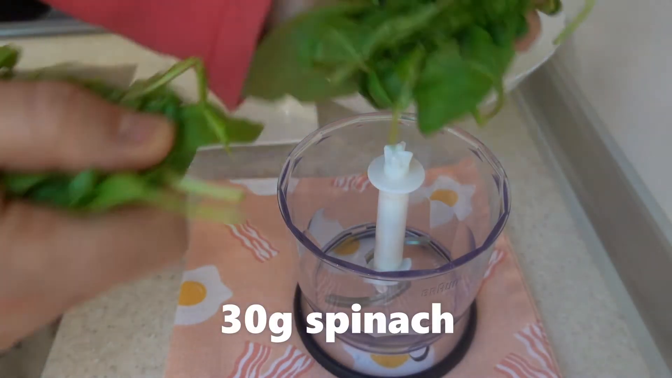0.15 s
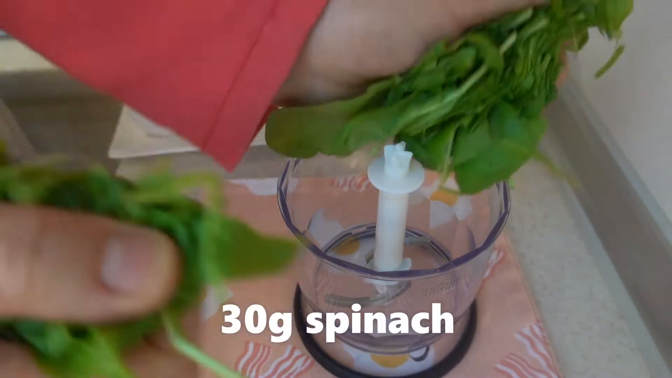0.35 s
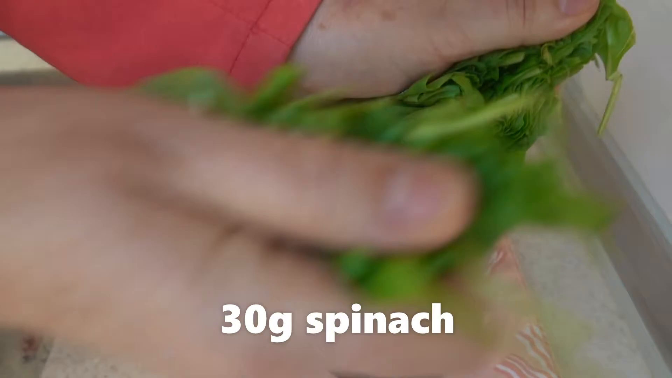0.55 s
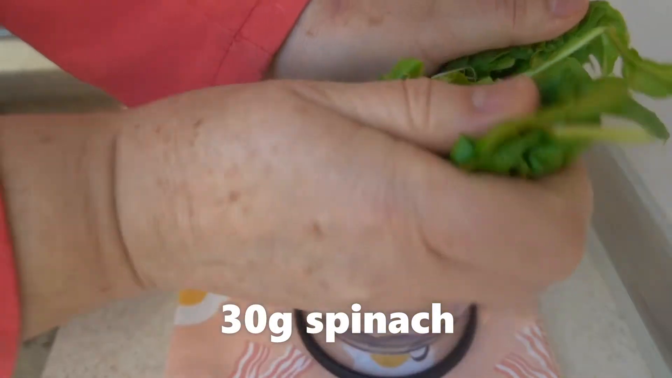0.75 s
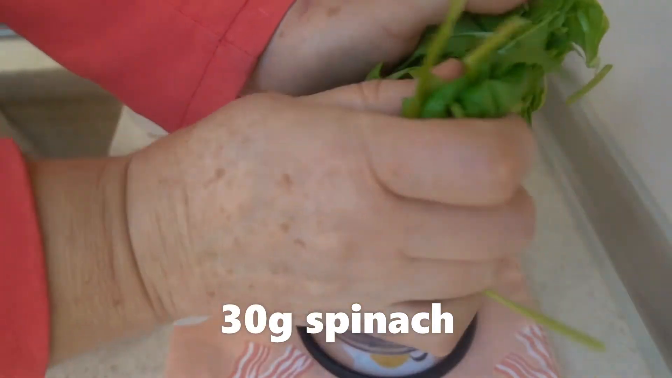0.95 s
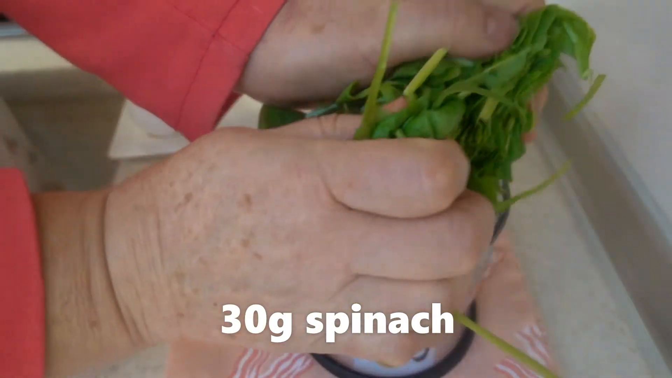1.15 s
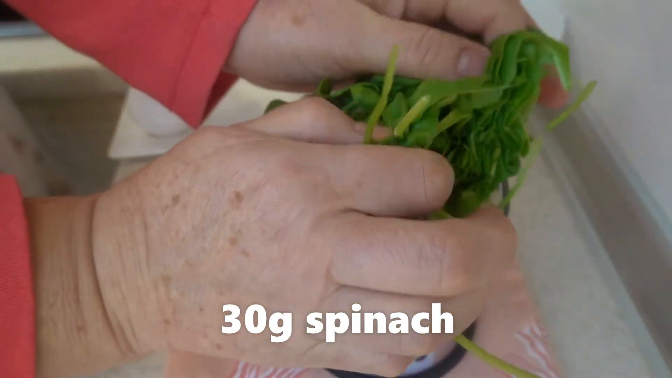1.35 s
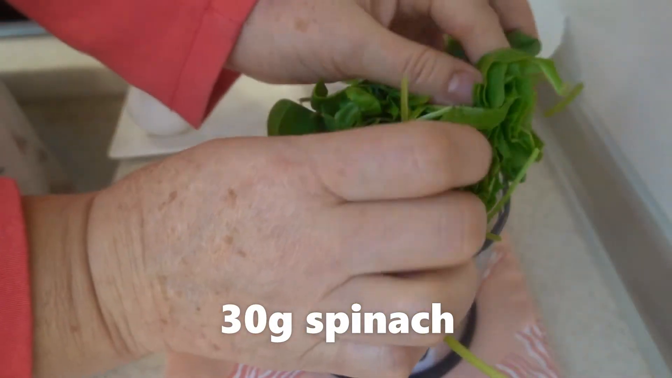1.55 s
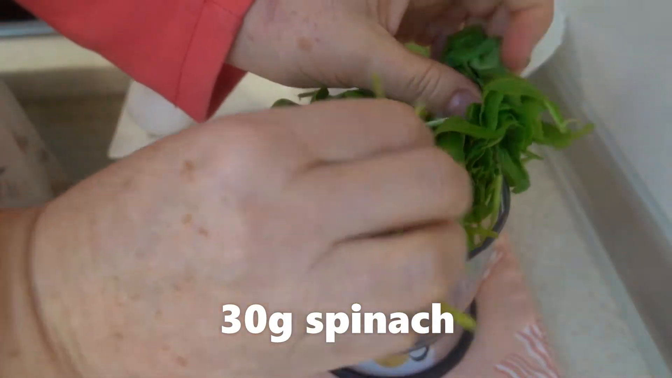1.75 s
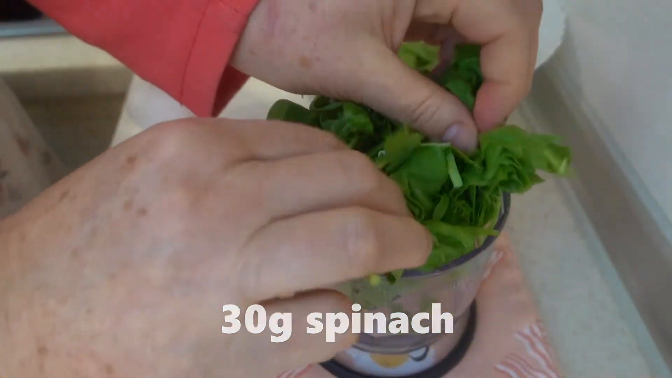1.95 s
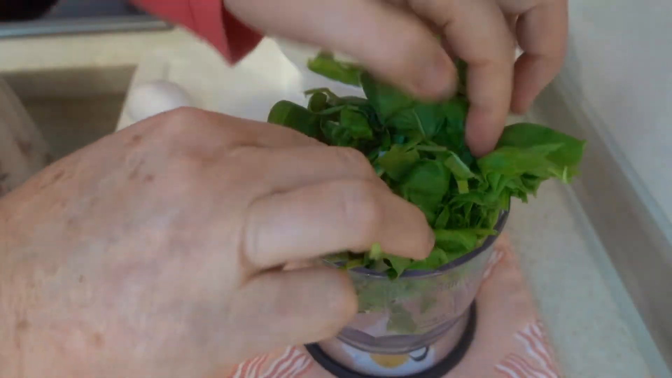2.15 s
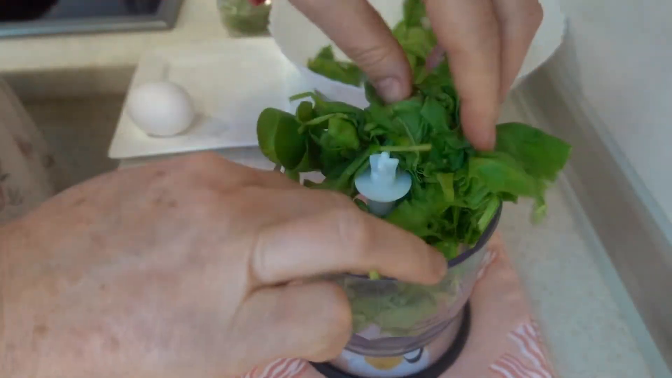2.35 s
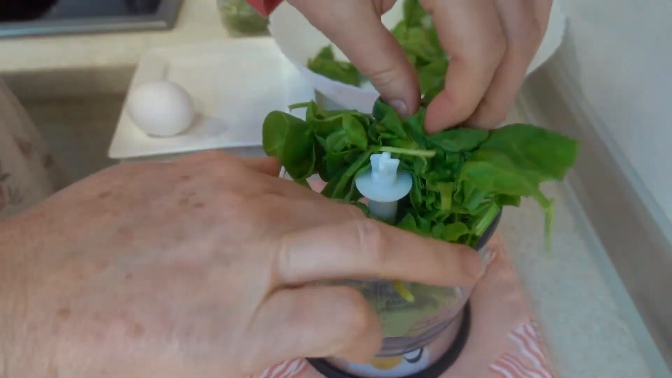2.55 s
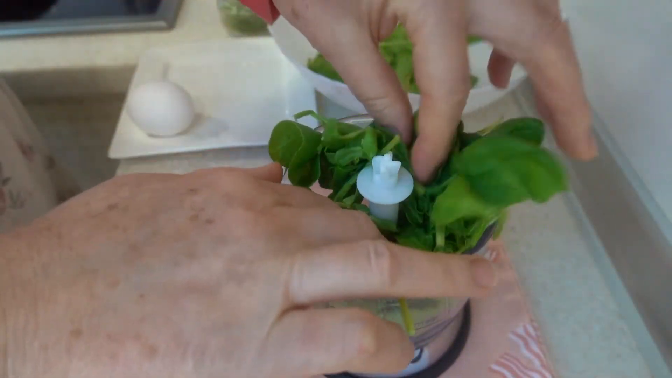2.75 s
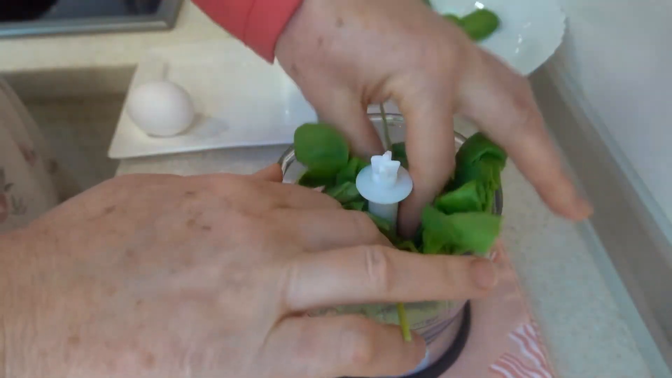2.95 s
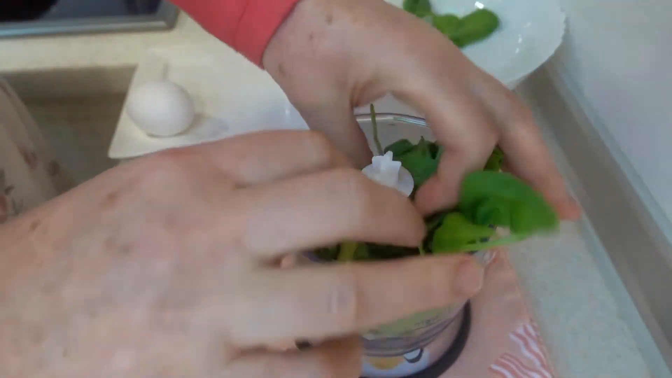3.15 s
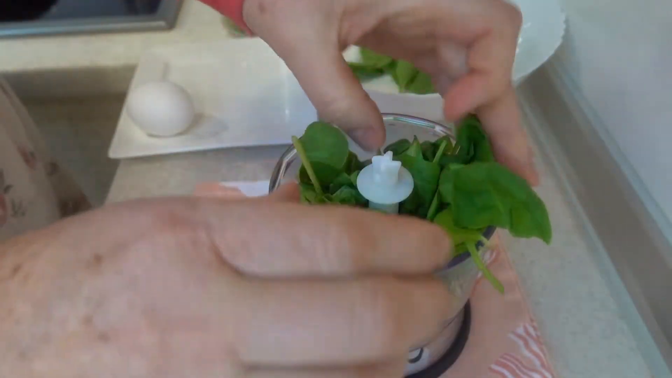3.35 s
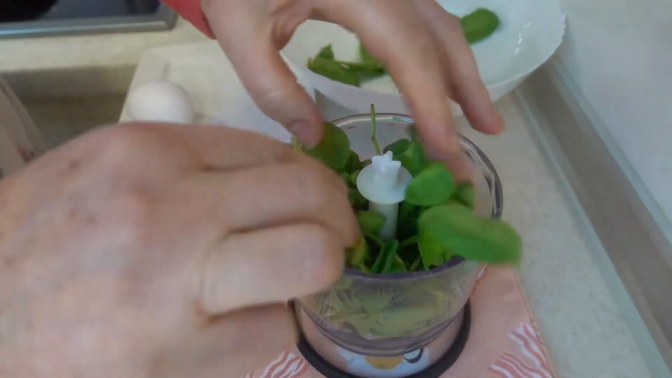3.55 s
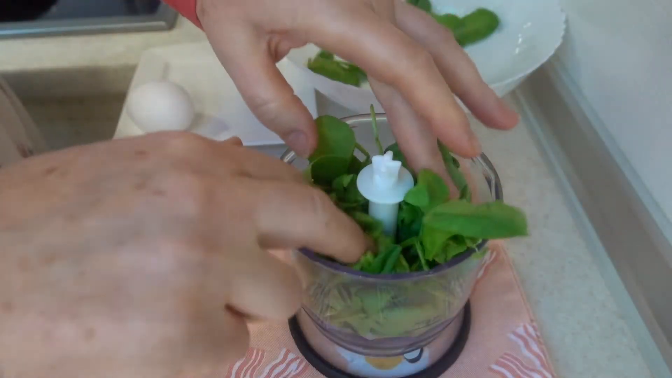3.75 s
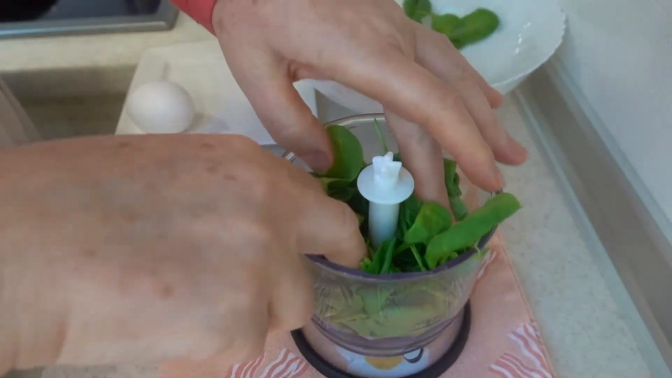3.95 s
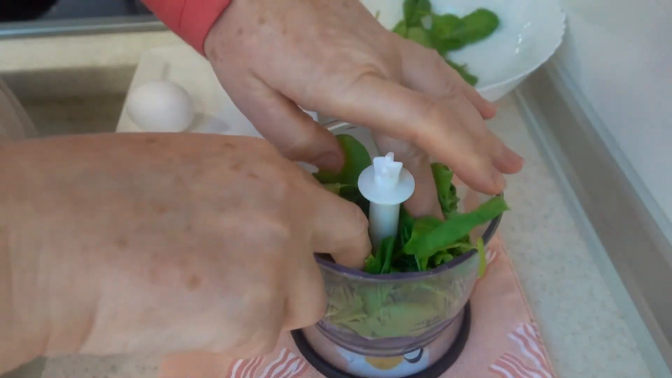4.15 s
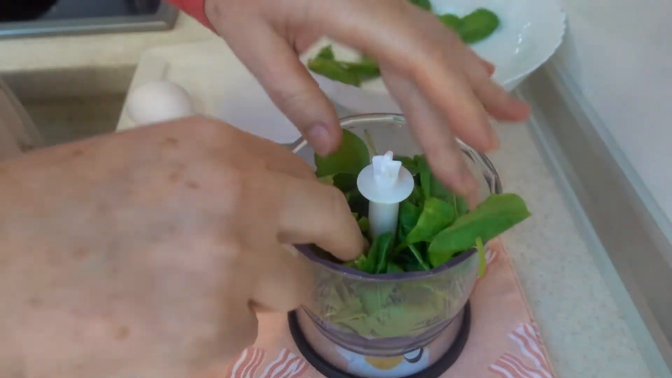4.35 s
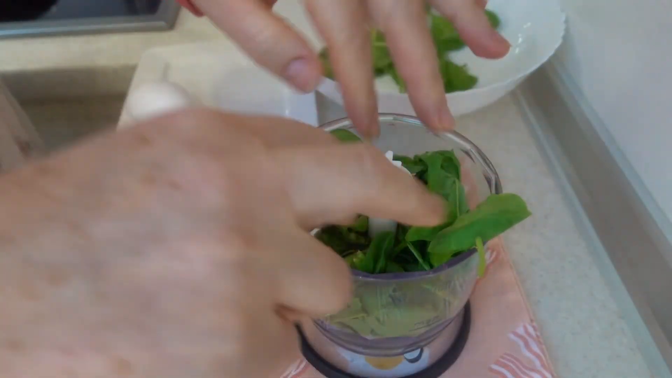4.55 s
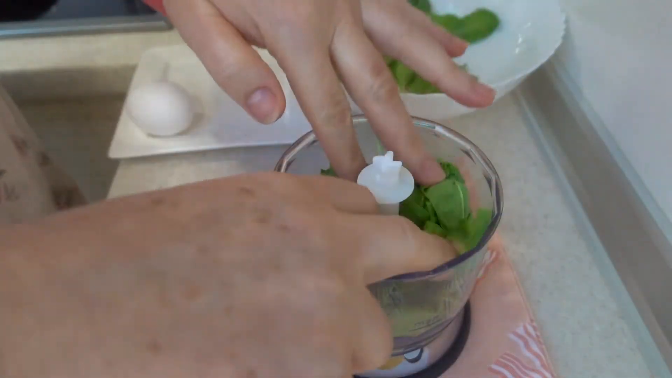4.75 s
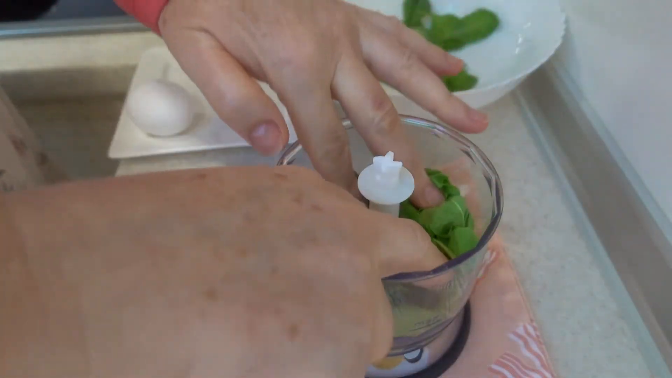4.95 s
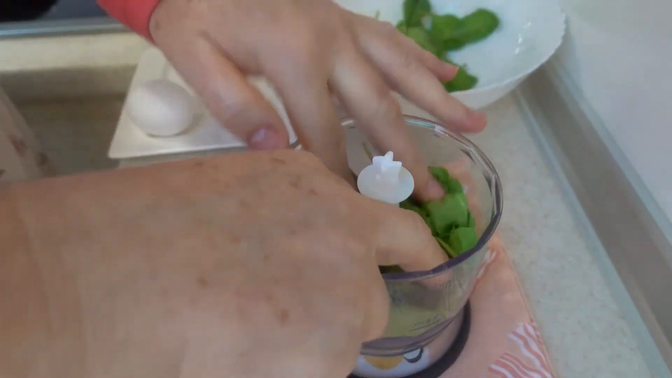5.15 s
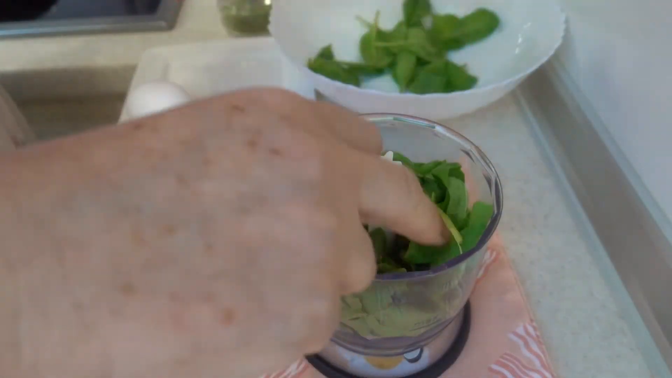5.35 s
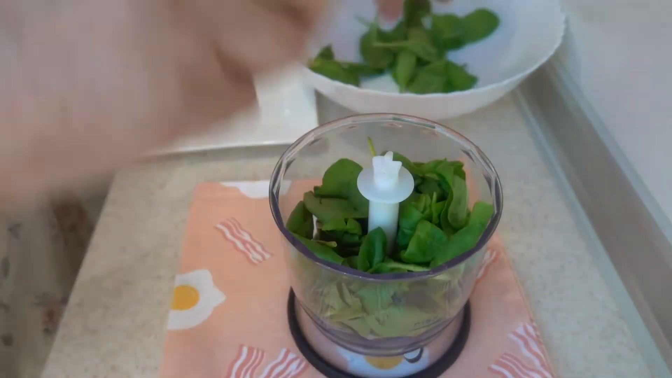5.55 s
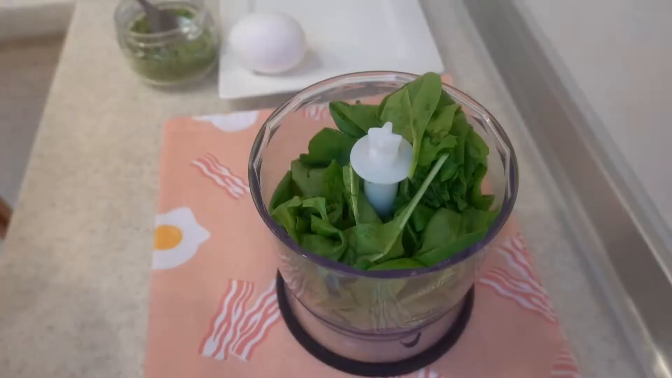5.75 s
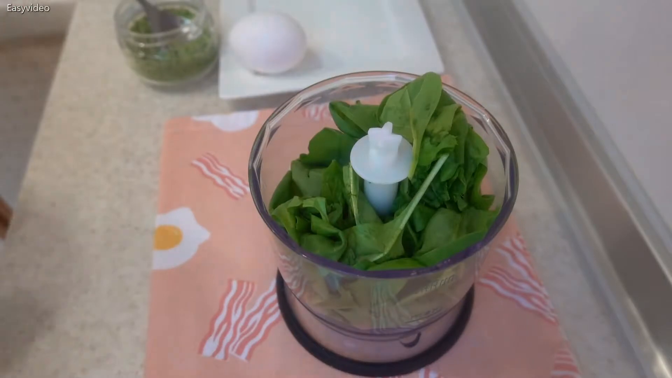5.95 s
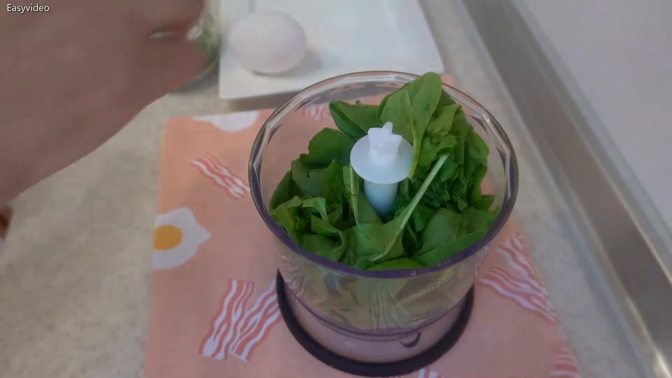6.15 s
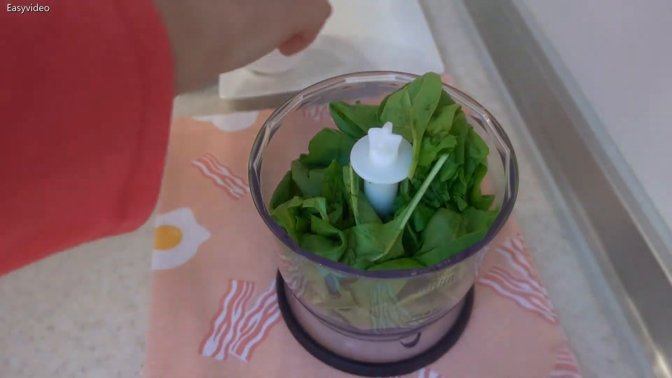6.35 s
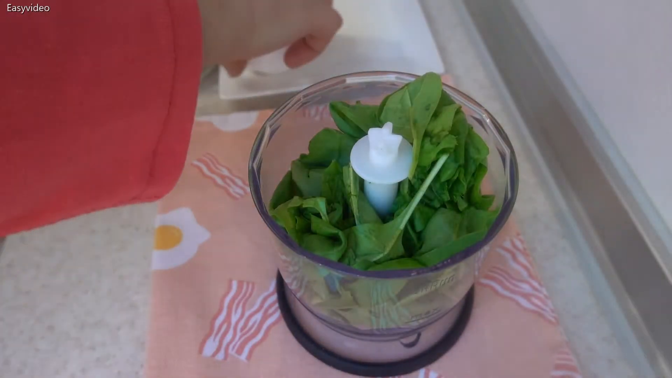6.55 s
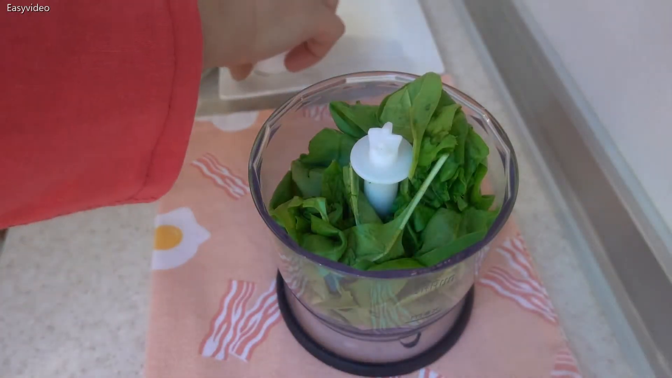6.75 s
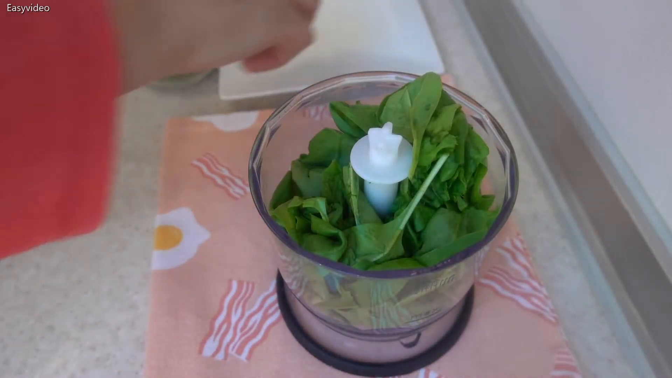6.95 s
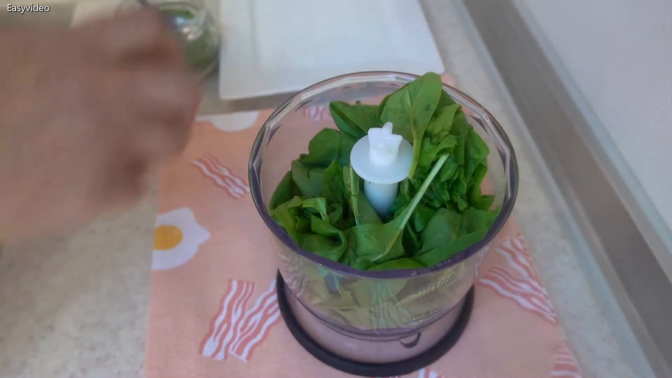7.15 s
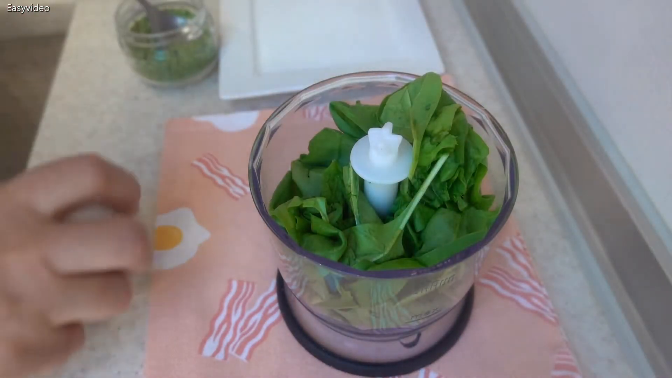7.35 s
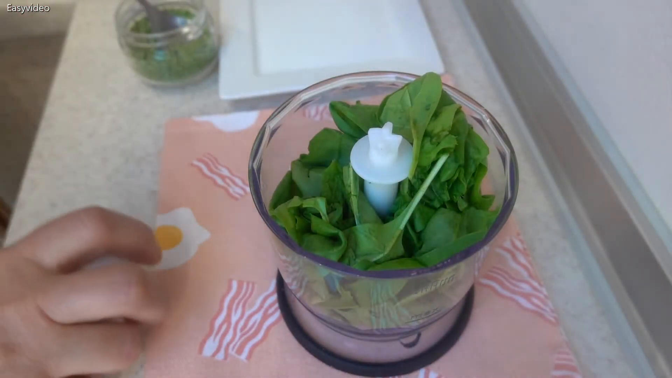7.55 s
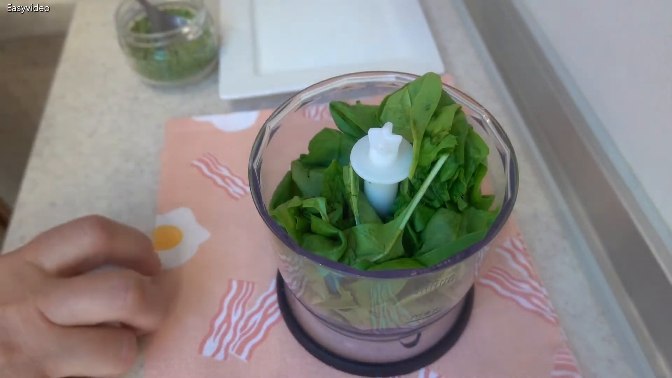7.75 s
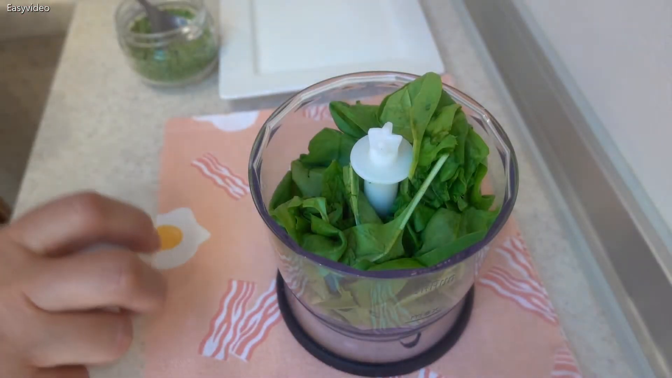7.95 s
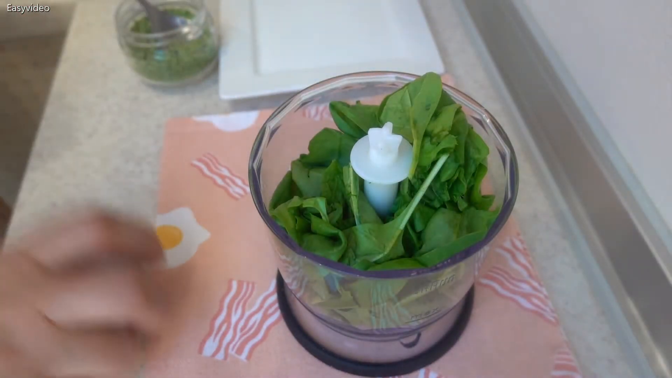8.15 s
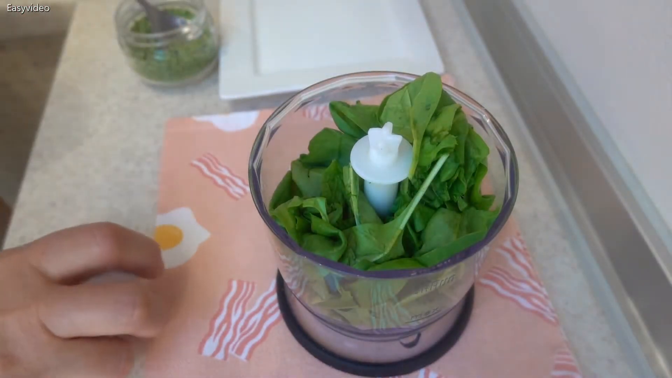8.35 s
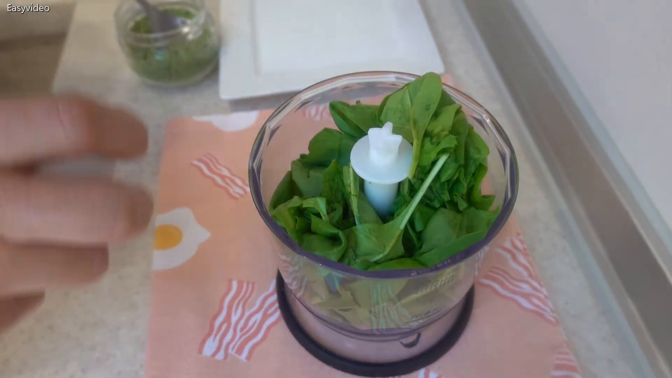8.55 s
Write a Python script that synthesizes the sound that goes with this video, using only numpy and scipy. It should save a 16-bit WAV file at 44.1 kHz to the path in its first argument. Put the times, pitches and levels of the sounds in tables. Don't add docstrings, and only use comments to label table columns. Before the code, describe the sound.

Close, crisp leafy crackling with stalk snaps and hollow bowl bumps, a dish clink, a brief dip, then soft rubbing and heavy egg taps.

```python
import sys
import numpy as np
from scipy import signal
from scipy.fft import rfft, irfft, next_fast_len
from scipy.io import wavfile
from scipy.ndimage import uniform_filter1d

SR = 44100
rng = np.random.default_rng(int(sys.argv[2]) if len(sys.argv) > 2 else 0)


def voltage_ratio(level):
    return 10 ** (np.asarray(level, float) / 20)


def unload_audio(sound):
    columns = np.transpose(np.atleast_2d(sound))
    steps = np.round(np.clip(columns, -1, 1) * 32767)
    wavfile.write(sys.argv[1], SR, steps.astype(np.int16))


N = 379682
TIME = np.arange(N) / SR
TOP_HZ, CUT_S = 15950, 5.78

# frequency_hz, density_db
AIR_SPECTRUM = [(180, -35.5), (300, 4), (326, -8.5), (491, -9.5), (683, -12.5), (874, -7), (965, -13),
                (1480, -17.5), (15300, -32)]
# frequency_hz, density_db
LOW_SPECTRUM = [(15, -45), (25, -19), (48, 3.5), (81, -3.5), (108, 2), (151, -1.5), (257, -1.5), (314, -15),
                (400, -9.5), (520, -47), (880, -120)]
AIR_DB, RUMBLE_DB = -58, -58.5
# peak_s, peak_db, rise_s, fall_s
BOOMS = [
    (.05, -58.5, 0.32, 1),
    (7.76, -53, 0.25, 1),
    (8.29, -45, 0.1, 0.34),
]
# time_s, pitch_hz, level_db
MOTOR_EARLY = [(1.25, 169.7, -75), (1.4, 172.2, -54.5), (1.6, 174, -62.5), (1.7, 176.6, -55),
               (1.83, 179.5, -52), (2.0, 184.5, -68)]
# time_s, pitch_hz, level_db
MOTOR_LATE = [(4.9, 170, -80), (5.3, 172, -61), (5.5, 169.6, -59), (5.6, 170, -75)]
# frequency_hz, side_minus_mid_db
WIDTH = [(60, -24), (180, -17), (550, -6.5), (1650, -5), (4970, 0), (15000, 0)]
KITCHEN_T60_S, WALL_CUT_HZ = 0.47, 3300

# frequency_hz, density_db
CLOTH_SPECTRUM = [(180, -27), (300, -12), (320, 9.5), (534, -18), (717, 5), (1010, -3.5), (1210, 0.5),
                  (15300, -7)]
# nearest_s, cloth_peak_db, rise_s, fall_s (over 23 dB), skin_minus_cloth_db
SLEEVE_PASSES = [
    (6.136, -49, 0.35, .5, -6),
    (6.95, -62, 0.2, .5, 3.5),
    (7.17, -61, 0.59, 0.37, -1.5),
    (7.58, -57.5, 0.061, 0.1, -6),
    (7.8, -65, .15, 0, -6),
]
# start_s, level_db, t60_s
EGG_RUBS = [(7.085, -49.5, 0.33), (7.125, -53, 0.17), (7.168, -41.5, 0.15), (7.252, -49, 0.15),
            (7.345, -53, .08), (7.4, -52, 0.11), (7.45, -48.5, 0.071)]

# start_s, peak_db, crack_minus_peak_db, contact_s
EGG_BLOWS = [
    (7.5963, -10.5, -22, 0.0024),
    (8.143, -16, -26, 0.0046),
    (8.157, -22, -5, 0.0045),
    (8.1669, -6.5, -43, 0.0057),
    (8.1951, -6.5, -35, 0.0058),
]
# frequency_hz, level_db, t60_s
SLAB_LOW_MODES = [(66.4, -8, 0.3), (125, -1, 0.21), (204.5, -7.5, 0.16), (255.1, -6, 0.35),
                  (276.4, -7, 0.36), (297, 6, 0.062), (345, -8, 0.092), (431, -22, 0.35)]
# frequency_hz, level_db, t60_s
SLAB_HIGH_MODES = [(430, -24, 0.19), (736, 3.5, 0.07), (1840, -11, 0.056), (2950, -7.5, .025)]
# time_s, level_db, treble_minus_level_db
SHELL_SPLIT = [
    (8.142, -24, -0.5),
    (8.2, -23.5, -6),
    (8.408, -53, -14),
    (8.6, -65, 3),
]
# frequency_hz, density_db
SHELL_SPECTRUM = [(290, -8), (500, -8), (577, -33), (849, -13.5), (966, -21.5), (1710, -9), (3040, -15.5),
                  (3450, -15), (4530, -15), (7480, -17.5), (15300, -29.5)]

# start_s, peak_db, long_ring_minus_peak_db
DISH_TOUCHES = [
    (5.6072, -16.5, -9),
    (5.6259, -21, -2.5),
    (5.6379, -16, -1.5),
]
# frequency_hz, level_db, t60_s
DISH_MODES = [(1087, 7, 0.032), (1391, -4.5, 0.78), (1650, 8, 0.024), (2085, -9, 0.65), (2040, -15, .4),
              (2200, 10, 0.034), (2858, -0.5, 0.46), (2800, -16, .4), (3100, -4, 0.032), (3790, -2, 0.15),
              (3930, -7, .04), (4790, -9, 0.083)]

# start_s, peak_db, pitch_hz, tick_minus_peak_db
BUMPS = [(1.056, -35.5, 272, 1), (1.843, -33, 205, 3), (.858, -37, 185, -20), (1.885, -24, 585, -23),
         (1.905, -30.5, 585, -20), (2.225, -32.5, 542, -11), (2.289, -28, 654, -17), (2.479, -37, 291, -2),
         (2.607, -31, 334, -22.5), (2.789, -31, 647, 2), (2.893, -26, 617, -1.5), (3.855, -28.5, 221, 6.5),
         (4.041, -43, 320, 16.5), (4.8305, -28, 126, 11), (5.575, -29, 293, -12), (5.61, -20, 277, -17),
         (5.62, -25.5, 354, -16), (5.63, -21.5, 394, -1.5), (5.648, -26.5, 332, -5), (6.364, -39, 129, -4),
         (6.574, -37.5, 237, -7), (6.592, -38.5, 352, -3.5), (6.706, -31.5, 345, -2.5),
         (1.98, -40, 567, -20), (2.263, -33, 587, -15), (2.543, -40.5, 557, -15), (2.646, -39, 650, -17),
         (2.67, -38, 237, -20), (2.696, -37, 336, -20), (2.722, -35, 592, -15), (2.754, -35, 608, -10),
         (3.675, -44.5, 729, -8), (3.943, -41, 258, -15), (4.905, -40, 352, -12), (4.934, -36, 692, -10),
         (5.67, -33.5, 478, -18), (5.7, -37, 360, -19)]
# start_s, peak_db, pitch_hz
THUDS = [
    (1.86, -40.5, 133),
    (2.232, -41.5, 122),
    (5.938, -46.5, 137),
]
# delay_s, level_db, sign
EDGE_TOUCHES = [
    (0, 0, 1),
    (.0019, -1, -1),
    (.0048, -1.5, 1),
]
# frequency_hz, level_db, t60_s
BOWL_WALL_MODES = [(320, -2.5, 0.063), (620, -6.5, 0.031), (1037, -0.5, 0.062), (1390, -4, 0.054),
                   (1650, -2, 0.033), (2110, -4.5, 0.04), (2270, -13, 0.033), (2790, -9, 0.028),
                   (3720, -9, .025)]
# frequency_hz, level_db, t60_s
PLATE_MODES = [(697, 3, 0.11), (1043, -4.5, 0.085), (2054, -9, 0.12), (2730, -19, 0.076), (3920, -21, 0.05)]
BUMP_T60_S, THUD_T60_S = 0.063, 0.33

# hardest_s, peak_db, rise_s, fall_s (over 23 dB)
DRAGS = [(1.07, -43, .02, 0.08), (1.11, -46, 0.027, 0.04), (1.33, -50, 0.11, 0.2), (1.42, -41, 0.061, .04),
         (1.84, -43.5, 0.043, 0.33), (2.27, -40, .08, 0.13), (2.3, -36.5, .04, 0.12),
         (2.49, -41, 0.035, .06), (2.61, -43.5, 0.067, .06), (2.72, -41, .06, 0.08),
         (2.79, -37.5, 0.069, 0.09), (2.91, -38, 0.033, 0.17), (3.95, -45, 0.079, 0.05),
         (4.06, -48, .04, 0.05), (4.68, -53, 0.041, 0.06), (4.88, -45, .04, 0.03), (4.94, -37, 0.065, 0.12),
         (5.13, -50, 0.041, 0.17)]
# frequency_hz, level_db, t60_s
HOLLOW_MODES = [(308, -8, 0.051), (607, 0, .04), (703, -3, 0.047), (1040, -9, 0.082), (1385, -11.5, .05),
                (1675, -9, .05)]
# time_s, pitch_hz, level_db
SQUEAK = [(5.21, 11700, -87), (5.23, 11600, -52), (5.28, 11650, -55), (5.3, 11600, -70)]

# start_s, peak_db, t60_s
LEAF_SLIDES = [(0.7594, -36.5, 0.2), (0.7994, -44, 0.1), (0.8694, -35, 0.18), (0.9094, -52, 0.17),
               (0.9333, -27, 0.087)]
# frequency_hz, width_hz, level_db
SKIN_PEAKS = [(3660, 180, 14), (5400, 150, 13), (6120, 350, 14), (7550, 300, 5), (9400, 370, 15)]

# start_s, peak_db, pitch_hz
STALKS = [(0.3298, -20, 4500), (.41, -21, 3540), (0.579, -29, 3020), (4.98, -19, 1870), (1.243, -19, 4400),
          (1.4004, -11, 4330), (1.466, -30, 4640), (1.499, -27, 4730), (1.6777, -25, 3720),
          (1.7882, -15.5, 3670), (2.2168, -18.5, 2050), (2.2933, -10, 2250), (2.4506, -13, 2420),
          (2.532, -17.5, 4600), (2.7698, -10, 3670), (2.8952, -13, 3330), (2.9415, -16, 3200),
          (3.1072, -18, 4800), (3.449, -25, 4730), (3.525, -24.5, 4600), (3.672, -18.5, 5030),
          (3.722, -11.5, 3730), (3.908, -25, 1650), (3.9383, -23, 2870), (4.042, -11, 2950),
          (4.062, -22, 1660), (4.8648, -19, 2980), (4.9335, -21, 2660), (4.961, -16.5, 5000),
          (5.029, -18.5, 3630), (.3117, -33, 3650), (.6055, -26, 3460), (1.8826, -26, 3570),
          (2.074, -26, 3550), (2.26, -19, 3450), (2.2822, -13, 4530), (2.3675, -27, 2200),
          (2.605, -23, 2560), (2.6697, -23, 1960), (2.7516, -21, 3600), (3.697, -27, 2900),
          (3.9584, -24.5, 3430), (4.0148, -27, 3570), (4.873, -22, 3040), (4.9043, -23, 4340),
          (4.919, -24, 3700), (4.951, -23, 2400), (1.81, -25, 2050), (2.98, -26, 1600), (2.79, -18, 3400),
          (4.095, -25, 3500)]
# start_s, peak_db, pitch_hz
VEINS = [(0.1076, -19, 7950), (1.085, -21, 6500), (2.0348, -18, 11000), (2.054, -16, 12300),
         (2.126, -13.5, 11200), (2.484, -15, 8000), (2.5698, -9.5, 11200), (2.644, -2.5, 11900),
         (3.096, -26.5, 10900), (3.7505, -12.5, 6500), (4.091, -28, 9000), (4.115, -18, 5800),
         (4.532, -33.5, 13500), (4.59, -35.5, 9000), (5.1864, -17, 11000), (5.0105, -24, 9250),
         (.577, -23, 6000), (2.393, -25, 9000), (2.4502, -12.5, 11000), (2.457, -17, 9000),
         (2.508, -22.5, 11500), (2.585, -21, 8500), (2.69, -23, 12000), (2.296, -13.5, 9500),
         (3.7215, -15, 9000), (1.4005, -17.5, 9500), (1.789, -19.5, 9500)]
# frequency_hz, level_db, t60_s
RIM_MODES = [(2200, -2.5, 0.029), (2870, -1, 0.024), (3670, 0.5, 0.028), (4600, -1, 0.023),
             (5370, -5, 0.019)]
STALK_T60_S, VEIN_T60_S, RIM_DB = 0.043, 0.031, -35.5

# frequency_hz, density_db
LEAF_SPECTRUM = [(180, -38), (300, 5.5), (460, -6.5), (589, 5.5), (933, -5), (1030, -6.5), (1320, -10),
                 (3600, -4), (15300, -19.5)]
# frequency_hz, width_hz, level_db
BOWL_PEAKS = [(715, 130, -2.5), (1040, 14, 9.5), (1650, 50, -27), (2136, 37, 0), (2560, 70, -4),
              (2870, 230, 4.5), (3670, 256, 7), (4600, 280, 0.5)]
# most_pressure_s, peak_db, rise_s, fall_s (over 23 dB)
SQUEEZES = [(.02, -44, 0.39, 0.5), (.335, -40.5, 0.047, 0.12), (.42, -42.5, 0.086, 0.28),
            (.59, -44.5, 0.26, 0.1), (.95, -47, 1.3, 1), (1.1, -42.5, 0.056, 0.55), (1.35, -42, 1.04, 1.32),
            (1.68, -45, 0.42, 0.05), (1.8, -45, 0.075, 0.26), (1.96, -45, .2, 0.89), (2.27, -33, .1, 0.27),
            (2.47, -41, 0.034, 0.48), (2.6, -40.5, 0.54, 0.1), (2.78, -34.5, 0.26, 0.27),
            (2.92, -38.5, 0.11, 0.29), (2.39, -45, .06, .1), (3.0, -43.5, 0.071, 0.11),
            (3.12, -41.5, 0.124, 0.16), (3.46, -57, 0.12, 1.8), (3.7, -46.5, 0.075, 0.38),
            (3.95, -40, 0.44, 0.33), (4.045, -35.5, 0.05, 0.15), (4.25, -42, 0.17, 0.13),
            (4.68, -49, 0.086, 0.31), (4.85, -45, 0.033, 0.25), (4.93, -35.5, 0.18, 0.15),
            (5.118, -41.5, 0.061, 0.23), (5.5, -59.5, 0.76, 0.33), (5.64, -45, 0.14, 0.26)]
# time_s, depth (0 to 1)
FINGER_DEPTH = [(0, 0.64), (2.1, 0.21), (2.3, 0.56), (2.6, 0.36), (3.6, 0.04), (4.04, 1), (4.6, 0),
                (5.0, 0.7)]
LET_GO = 1.12
REACH_S = 0.68
BOWL_AIR_DB, AIR_BEFORE_DB, PUSH_DB = -12.5, -5, -16
TOP_DB, TOP_LOST_DB = 0.9, 14
FIRST_SHOT_DB, FADE_DB, FADE_OUT_S, FADE_IN_S = 2, -47, 0.029, 0.031


def in_time(rows, off=-120):
    s, first, *rest = np.transpose(rows)
    return [np.interp(TIME, s, first, off, off)] + [np.interp(TIME, s, column) for column in rest]


def at_hz(points, hz):
    point_hz, db = np.array(points)[:, 0], np.array(points)[:, 1]
    return np.interp(np.log(hz + 1), np.log(point_hz), db)


def rms_one(x):
    return x / np.sqrt(np.mean(x ** 2) + 1e-20)


def place(s, sound):
    start = round(s * SR)
    return slice(start, start + len(sound))


def ring(clicks, hz, t60):
    radius, angle = voltage_ratio(-60 / (t60 * SR)), 2 * np.pi * hz / SR
    return signal.lfilter([0, np.sin(angle)], [1, -2 * radius * np.cos(angle), radius * radius], clicks + 1e-18)


def struck(modes, clicks):
    return sum((-1) ** k * voltage_ratio(db) * ring(clicks, hz, t60) for k, (hz, db, t60) in enumerate(modes))


def coloured(spectrum, low_hz, high_hz, width_db=0.0, peaks=()):
    size = next_fast_len(N)
    hz = np.arange(size // 2 + 1) * SR / size
    edges = (1 + (low_hz / (hz + 1)) ** 8) * (1 + (hz / high_hz) ** 8)
    gain = voltage_ratio(at_hz(spectrum, hz)) / np.sqrt(edges)
    for centre, wide, db in peaks:
        gain = gain * (1 + 0.94 * voltage_ratio(db) / (1 + (2 * (hz - centre) / wide) ** 2))
    mid, side = rfft(rng.standard_normal((2, size))) * gain * (hz < TOP_HZ)
    both = mid + voltage_ratio(at_hz(WIDTH, hz) + width_db) * side * [[1], [-1]]
    return rms_one(irfft(both, size)[:, :N])


def crinkle(per_s, spread_db, t60, smooth, rise=0.0015):
    sizes = voltage_ratio(spread_db * np.minimum(rng.exponential(1, N), 4)) ** 2
    born = sizes * (rng.random(N) < per_s / SR)
    energy = signal.lfilter([1], [1, -voltage_ratio(-120 / (t60 * SR))], born + 1e-18)
    energy = signal.lfilter([1], [1, -np.exp(-1 / (rise * SR))], energy)
    return rms_one(np.sqrt(energy / energy.mean() + smooth ** 2))


def swells(rows, rise):
    out, t = np.zeros(N), TIME[:12000]
    for s, db, t60 in rows:
        out[place(s, t)] += voltage_ratio(db - 60 * t / t60) * (1 - np.exp(-t / rise))
    return out


def strokes(rows):
    t = TIME[::32]
    power = 1e-12
    for s, db, rise, fall in rows:
        away = np.where(t < s, (s - t) / rise, (t - s) / fall)
        power = power + voltage_ratio(2 * db - 46.2 * away ** LET_GO)
    return np.interp(TIME, t, 10 * np.log10(power))


def tone(rows, rough):
    db, hz = in_time(np.array(rows)[:, [0, 2, 1]])
    wobble = rms_one(uniform_filter1d(rng.standard_normal(N), size=300))
    return voltage_ratio(db + 2.0) * np.sin(2 * np.pi * np.cumsum(hz) / SR + rough * wobble)


def room_air():
    return voltage_ratio(AIR_DB - 4.5) * coloured(AIR_SPECTRUM, 363, 18000, 4.2)


def rumble():
    level = np.hypot(voltage_ratio(RUMBLE_DB), voltage_ratio(strokes(BOOMS)))
    return level * coloured(LOW_SPECTRUM, 32, 346)


def motor():
    return tone(MOTOR_EARLY, rough=0.39) + tone(MOTOR_LATE, rough=0.6)


def kitchen(x):
    size = next_fast_len(N + SR)
    hz = np.arange(size // 2 + 1) * SR / size
    turn, pole = np.exp(-2j * np.pi * hz / SR), np.exp(-2 * np.pi * WALL_CUT_HZ / SR)
    dull = (1 - pole) / (1 - pole * turn)
    walls = np.zeros((2, len(turn)), complex)
    lags = (rng.uniform(.009, 0.039, 16) * SR).astype(int)
    for k, lag in enumerate(lags):
        loop = voltage_ratio(-60 * lag / SR / KITCHEN_T60_S) * dull * turn ** lag
        walls[k % 2] += loop / (1 - loop) * (-1) ** (k // 2)
    walls = walls[0] + voltage_ratio(at_hz(WIDTH, hz) - 10.0) * walls[1] * [[1], [-1]]
    shots = (TIME < CUT_S, TIME >= CUT_S)
    before, after = [irfft(walls * rfft(x * shot, size), size)[:, :N] for shot in shots]
    return before * (TIME < CUT_S) + after


def sleeve():
    cloth_db = strokes([row[:4] for row in SLEEVE_PASSES])
    skin_db = strokes([(s, db + rel_db, 1.2 * rise, 1.55 * fall) for s, db, rise, fall, rel_db in SLEEVE_PASSES])
    cloth = voltage_ratio(cloth_db) * coloured(CLOTH_SPECTRUM, 396, 3840, 1.0) * crinkle(380, 8.4, 0.053, 2.0)
    skin = voltage_ratio(skin_db) * coloured(CLOTH_SPECTRUM, 3700, 27000, .5)
    finger_peaks = [(5260, 250, 7.9), (6500, 250, 4.5)]   # frequency_hz, width_hz, level_db
    rubs = swells(EGG_RUBS, 0.0049) * coloured(CLOTH_SPECTRUM, 4600, 18000, .5, finger_peaks)
    return (cloth + skin) * (TIME > CUT_S) + rubs


def egg_on_counter():
    push, contact = np.zeros(N), np.zeros(N)
    for s, db, crack_db, contact_s in EGG_BLOWS:
        force = np.hanning(round(contact_s * SR))
        push[place(s, force)] -= voltage_ratio(db - 16.5) * np.gradient(force)
        contact[round((s + .0015) * SR)] = voltage_ratio(db + crack_db)
    crack_envelope = signal.lfilter([1], [1, -voltage_ratio(-60 / (0.023 * SR))], contact)
    crack = crack_envelope * coloured(CLOTH_SPECTRUM, 740, 2600, -5.0)
    slab = sum(voltage_ratio(db) * ring(push, hz, t60) for hz, db, t60 in SLAB_LOW_MODES)
    tap = signal.lfilter([.3], [1, -.7], contact * (TIME < 8))
    return slab + voltage_ratio(1.5) * struck(SLAB_HIGH_MODES, tap), crack


def shell():
    db, top_db = in_time(SHELL_SPLIT)
    fading = voltage_ratio(-4 - 110 * np.clip(TIME - 8.21, 0, 1))
    note = fading * coloured(SHELL_SPECTRUM, 1840, 2000, -9.0, [(1684, 46, 16.0)])
    body = coloured(SHELL_SPECTRUM, 424, 3770, -2.0, [(1870, 330, -7.0)])
    body = body + voltage_ratio(top_db) * coloured(SHELL_SPECTRUM, 5200, 17000, 0.95)
    return voltage_ratio(db - 2.5) * crinkle(1200, 1.8, 0.01, 0.93) * (body + note)


def dish():
    clack, chime = np.zeros((2, N))
    for s, db, ring_db in DISH_TOUCHES:
        clack[round(s * SR)] = voltage_ratio(db - 20.0)
        chime[round(s * SR)] = voltage_ratio(db - 20.5 + ring_db)
    clack = signal.lfilter([0.61, 0.016, 0.01, 0, 0.26], [1, -.3], clack)
    short_modes = [mode for mode in DISH_MODES if mode[2] < .1]
    long_modes = [mode for mode in DISH_MODES if mode[2] >= .1]
    return (struck(short_modes, clack) + struck(long_modes, chime)) * (TIME < CUT_S)


def bumps():
    out, t, ticks = np.zeros(N), TIME[:14000], np.zeros(N)
    rows = [(s, db, hz, BUMP_T60_S) for s, db, hz, _ in BUMPS]
    rows = rows + [(s, db, hz, THUD_T60_S) for s, db, hz in THUDS]
    for s, db, hz, t60 in rows:
        note = np.sin(2 * np.pi * hz * t)
        note = note + 0.054 * np.sin(2 * np.pi * 1.9 * hz * t) + 0.35 * np.sin(1.3 * np.pi * hz * t)
        out[place(s, t)] += voltage_ratio(db + 0.5 - 60 * t / t60) * (1 - np.exp(-t / 0.0035)) * note
    for s, db, _, tick_db in BUMPS:
        for delay, touch_db, sign in EDGE_TOUCHES:
            ticks[round((s + delay) * SR)] = sign * voltage_ratio(db + tick_db - 13.5 + touch_db)
    return out + struck(BOWL_WALL_MODES, ticks * (TIME < CUT_S)) + struck(PLATE_MODES, ticks * (TIME > CUT_S))


def drags():
    slips = rng.standard_normal(N) * crinkle(150, 2.8, .03, 0.37)
    return voltage_ratio(strokes(DRAGS) - 4.5) * rms_one(struck(HOLLOW_MODES, slips))


def squeak():
    return tone(SQUEAK, rough=2.2)


def leaf_slides():
    return swells(LEAF_SLIDES, 0.014) * coloured(LEAF_SPECTRUM, 3900, 11000, 0.38, SKIN_PEAKS)


def snaps():
    out, t = np.zeros((2, N)), TIME[:3500]
    high = signal.butter(2, 1500, "high", fs=SR, output="sos")
    for s, db, hz in STALKS + VEINS:
        t60 = STALK_T60_S if hz < 5500 else VEIN_T60_S
        shape = 1.3 * voltage_ratio(-60 * t / .007) + voltage_ratio(-60 * t / t60)
        mid, side = rng.standard_normal((2, len(t))) * shape
        mid[0] += 4.0
        side = signal.lfilter([.5, -.5], [1, -.55], side)
        burst = mid + 0.99 * side * [[1], [-1]]
        burst[:, 52:] += .5 * burst[:, :-52]
        band = signal.butter(2, [0.77 * hz, min(1.483 * hz, .4 * SR)], "band", fs=SR, output="sos")
        burst = signal.sosfilt(band, burst) + 0.57 * signal.sosfilt(high, burst)
        out[:, place(s, t)] += voltage_ratio(db - 5.0) * burst / abs(burst).max()
    return 0.99 * out + voltage_ratio(RIM_DB) * struck(RIM_MODES, out)


def crackle():
    clumps = crinkle(50, 3.0, 0.073, .45, rise=0.0055) ** 2
    born = rng.random(N) < 900.0 * clumps / SR
    sizes = born * voltage_ratio(4.0 * np.minimum(rng.exponential(1, N), 4)) * rng.choice([-1, 1], N)
    pops = sizes * voltage_ratio(rng.normal(0, 1.4, N) * [[1], [-1]])
    pitches, dealt = np.geomspace(1900, 14000, 18), rng.integers(0, 18, N)
    out = np.zeros((2, N))
    for k, hz in enumerate(pitches):
        out += voltage_ratio(at_hz(LEAF_SPECTRUM, hz)) * ring(pops * (dealt == k), hz, 26.0 / hz)
    return rms_one(out)


def leaves():
    body_db = strokes(SQUEEZES) - 120 * (TIME > CUT_S)
    depth, = in_time(FINGER_DEPTH, off=0.35)
    top_db = TOP_DB - TOP_LOST_DB * depth
    air_db = BOWL_AIR_DB + 1.3 * depth + AIR_BEFORE_DB * (TIME < REACH_S)
    folds = crinkle(90, spread_db=-6.0, t60=0.23, smooth=0.43, rise=0.0036)
    out = voltage_ratio(air_db) * coloured(LEAF_SPECTRUM, 263, 1400, -11.0, BOWL_PEAKS) * crinkle(80, 1.0, 0.059, 0.83)
    out = out + voltage_ratio(PUSH_DB) * (TIME > REACH_S) * coloured(LOW_SPECTRUM, 106, 330)
    # low_hz, high_hz, level_db
    registers = [(1180, 2300, -7.0), (2300, 1330, -6.0), (4030, 16000, -3.5), (6080, 7500, 1.5), (9000, 32000, 3.0)]
    for low_hz, high_hz, db in registers:
        creases = crinkle(220, 3.3, 150.0 / low_hz, 0.89, rise=0.00024)
        creases = creases * crinkle(14, 1.8, 0.47, 0.73, rise=0.026)
        level = voltage_ratio(db + top_db * (low_hz > 5000))
        out = out + level * coloured(LEAF_SPECTRUM, low_hz, high_hz, -2.3, BOWL_PEAKS) * creases
    return voltage_ratio(body_db - 3.0) * out * folds + voltage_ratio(body_db - 10.5) * crackle()


def scene():
    slab, crack = egg_on_counter()
    centre = bumps() + dish() + slab + squeak()
    centre = signal.sosfilt(signal.butter(2, 65, "high", fs=SR, output="sos"), centre)
    near = (leaves() + snaps()) * voltage_ratio([[-.4], [.4]])
    near = near + leaf_slides() + sleeve() + crack + shell()
    wet = voltage_ratio(-22.0) * kitchen(near.mean(axis=0) + voltage_ratio(3.0) * centre)
    return near + centre + drags() + wet + room_air() + rumble() + motor()


def scene_change():
    first = voltage_ratio(FIRST_SHOT_DB) * np.clip((CUT_S - TIME) / FADE_OUT_S, 0, 1) ** 2
    second = np.clip((TIME - CUT_S) / FADE_IN_S, 0, 1) ** 2
    return first + second + voltage_ratio(FADE_DB)


def roll_off(x):
    return signal.sosfilt(signal.butter(12, 16990, fs=SR, output="sos"), x)


def record(dry):
    low_pass = signal.cheby2(12, 70, 17000, fs=SR, output="sos")
    mix = signal.sosfilt(low_pass, dry) * scene_change()
    return roll_off(mix)


dry = scene()
out = record(dry)
unload_audio(out)
```